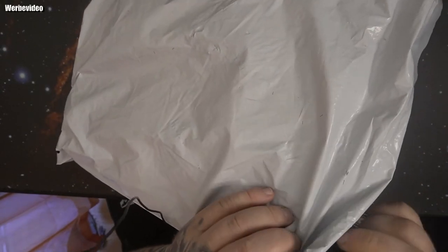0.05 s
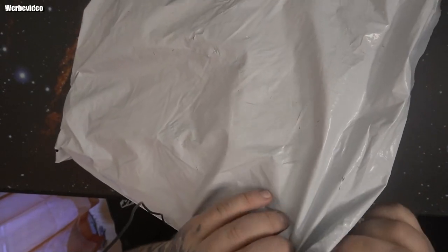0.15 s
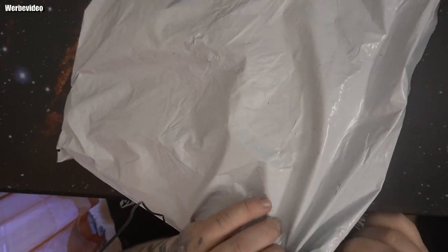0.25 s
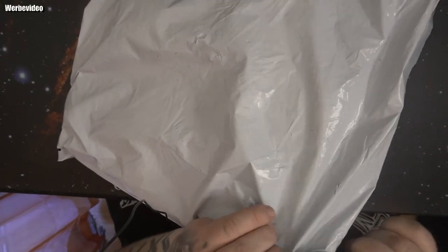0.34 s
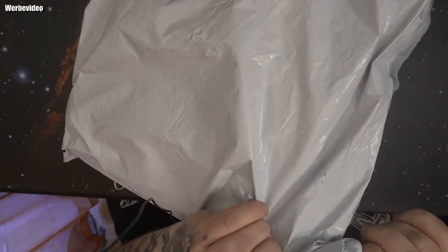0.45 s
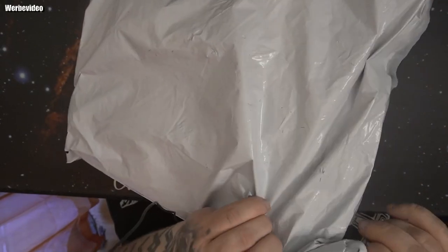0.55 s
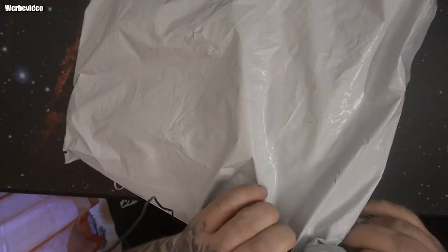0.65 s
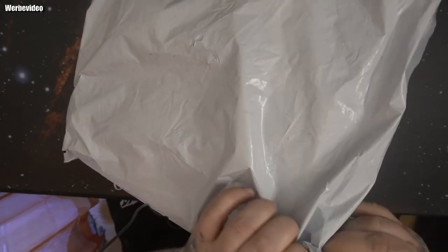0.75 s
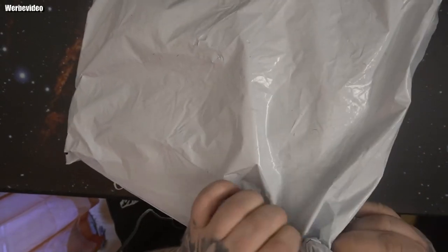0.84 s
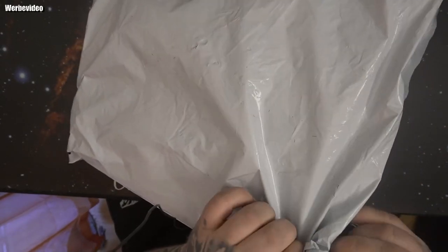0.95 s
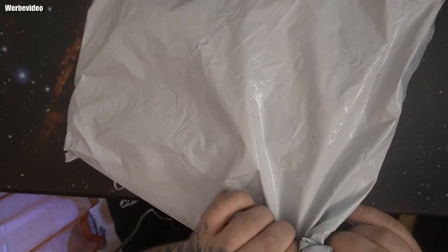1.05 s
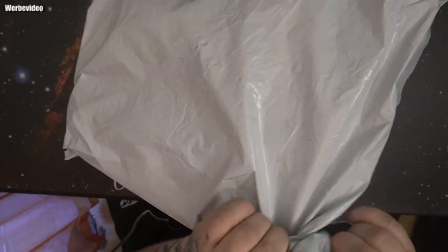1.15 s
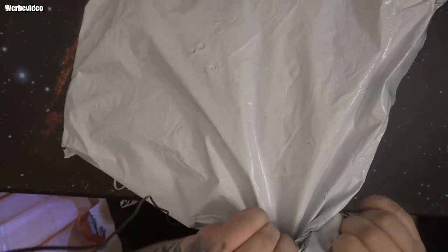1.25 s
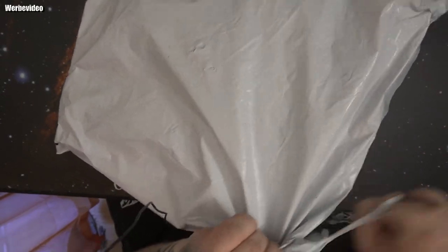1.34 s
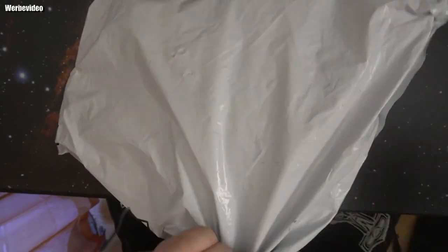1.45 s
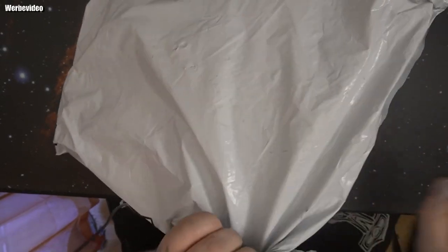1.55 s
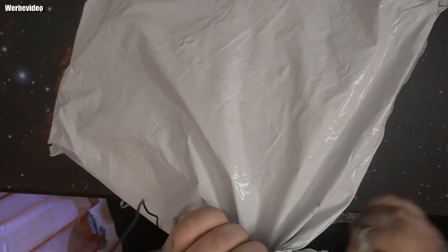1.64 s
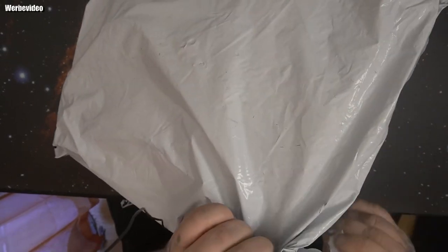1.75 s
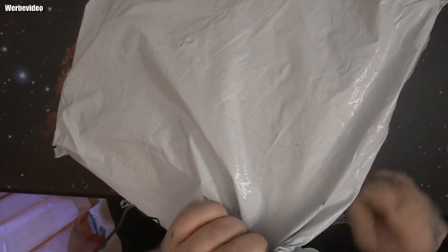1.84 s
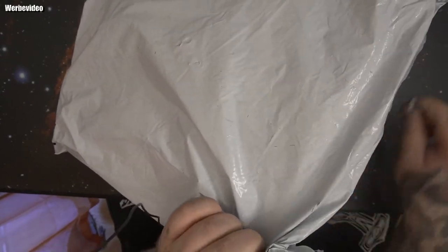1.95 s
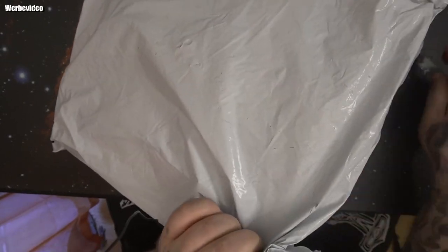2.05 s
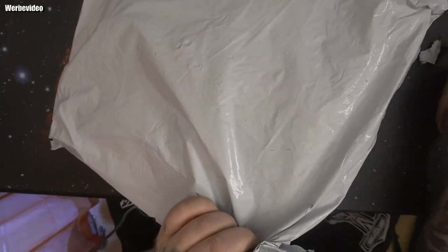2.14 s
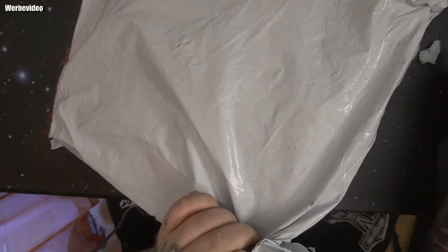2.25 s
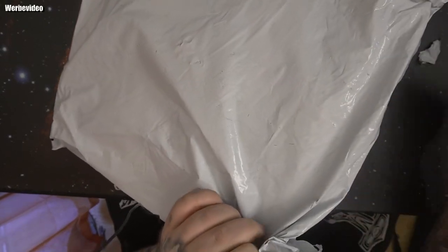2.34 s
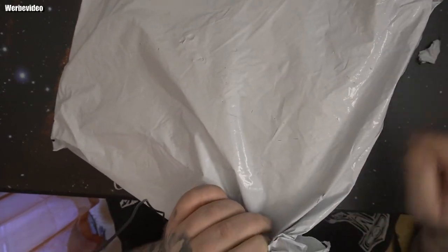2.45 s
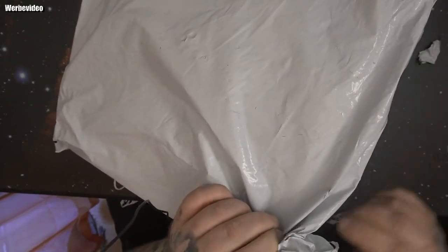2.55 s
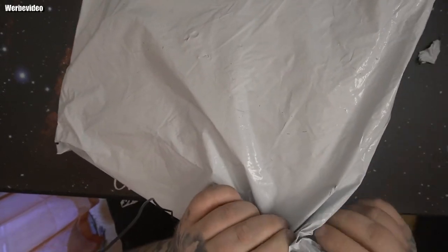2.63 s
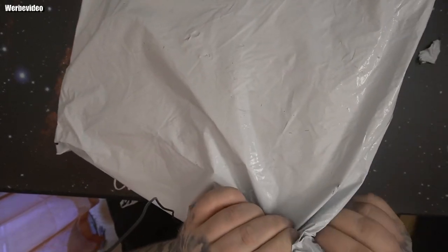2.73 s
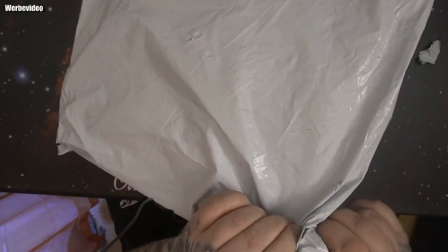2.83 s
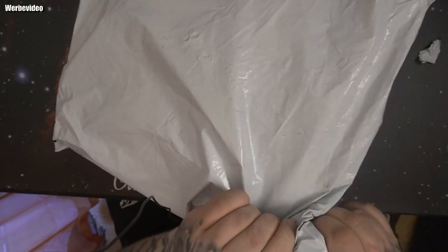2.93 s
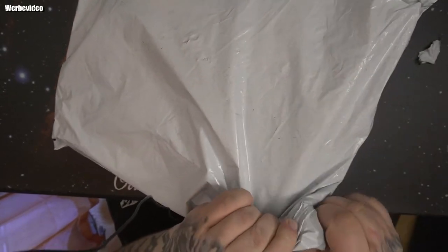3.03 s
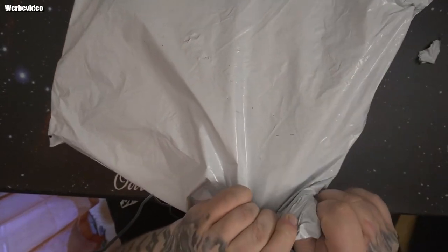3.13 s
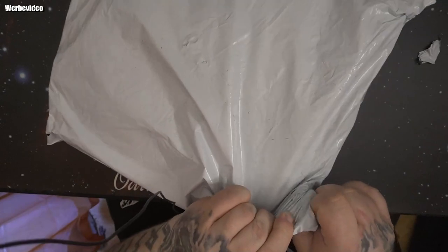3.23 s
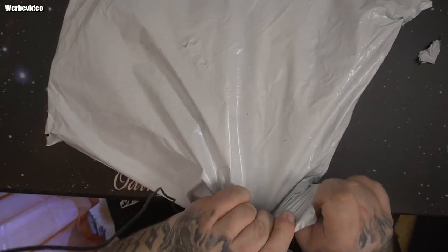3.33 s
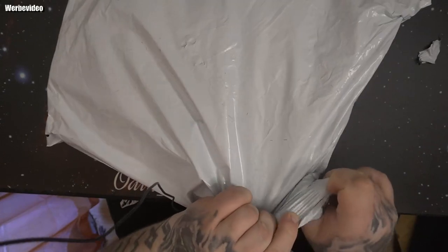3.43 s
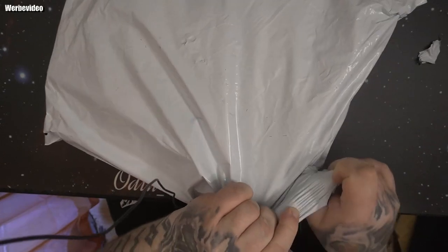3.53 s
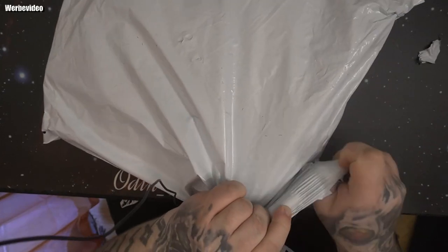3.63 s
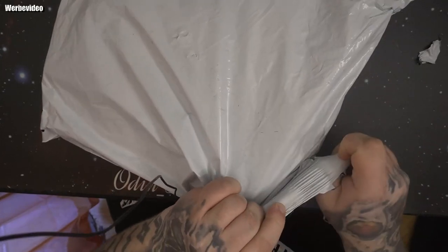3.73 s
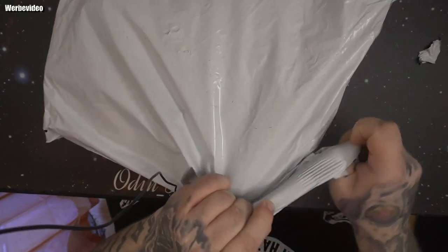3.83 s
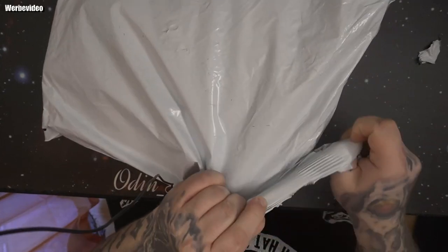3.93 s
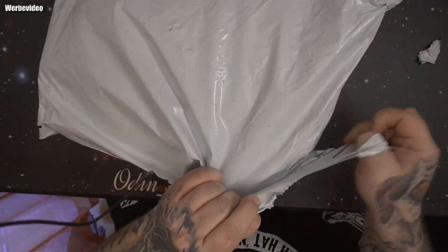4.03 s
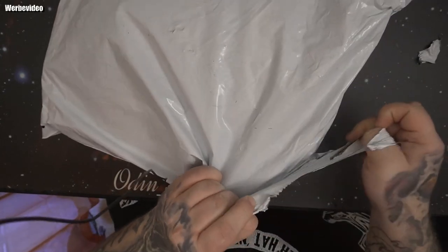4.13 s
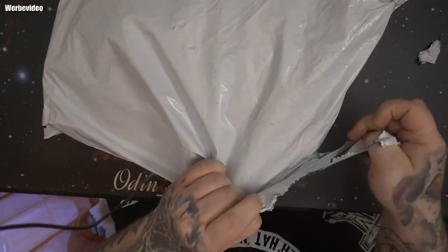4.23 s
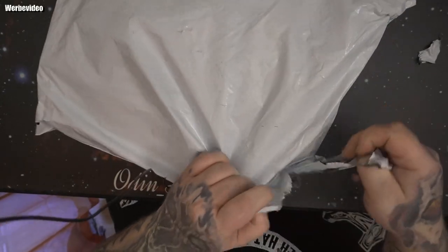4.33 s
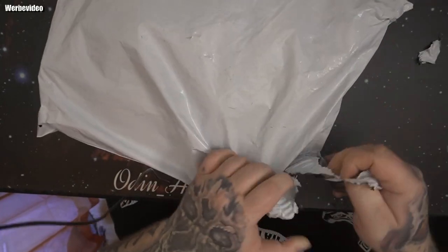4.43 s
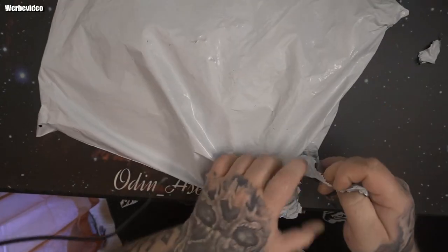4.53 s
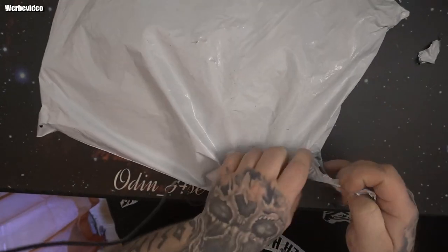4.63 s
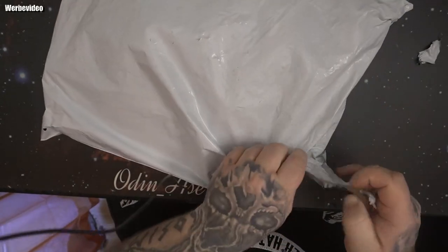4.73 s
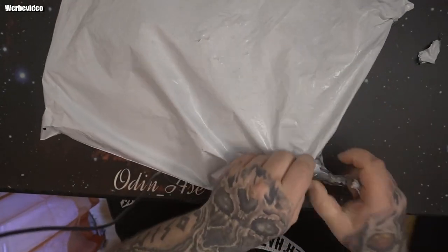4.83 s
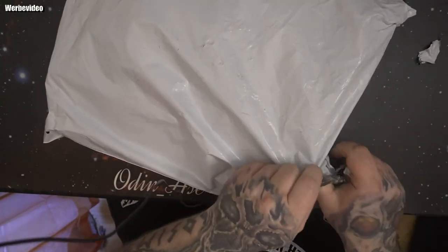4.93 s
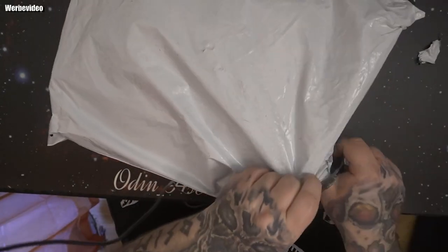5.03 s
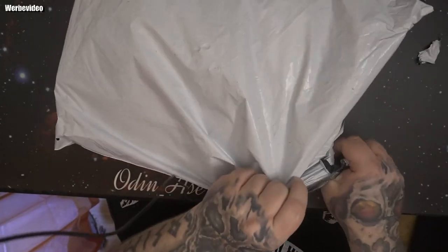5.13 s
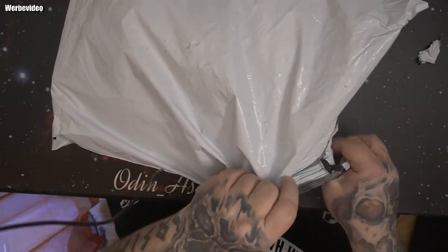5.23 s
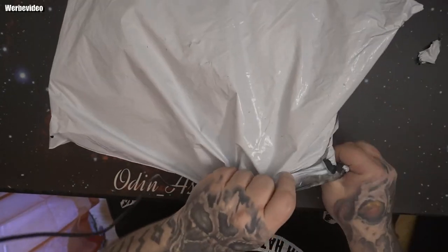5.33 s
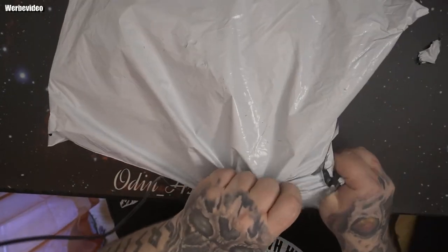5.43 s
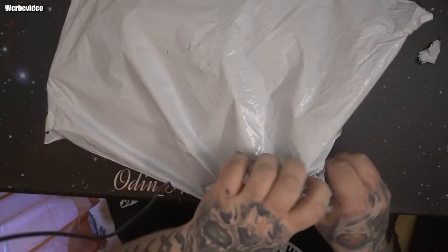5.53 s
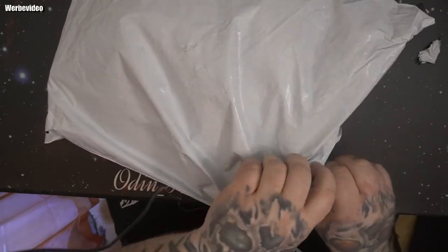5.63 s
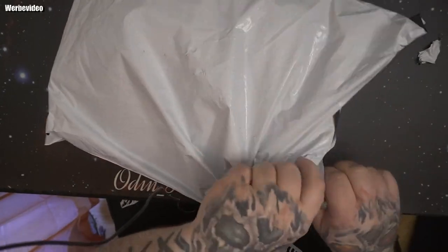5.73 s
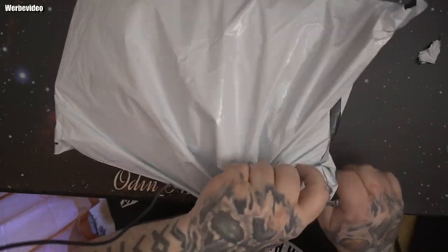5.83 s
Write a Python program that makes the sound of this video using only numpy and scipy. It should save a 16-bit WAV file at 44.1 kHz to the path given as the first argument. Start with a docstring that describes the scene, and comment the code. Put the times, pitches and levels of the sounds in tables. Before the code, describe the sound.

Close, crisp plastic crinkling with a loud early crunch, a faint rustling lull, then vigorous crackling and ripping with soft desk knocks.

```python
"""A thin plastic mailer bag is gripped, stretched and torn by two hands on a desk, close below a microphone.
Creases snap over one by one, each a tick and a noise puff ringing resonances; swarms of tiny creases
are random ticks and puffs in bands, and sliding fingers are bright noise. The microphone's desk arm sways
as noise around ten cycles a second, and is jolted, with a knock of the desk, when a hand lands.
Short feedback delays make the room around the bag; steady coloured noise is the quiet room tone."""
import sys
import numpy as np
from scipy import signal
from scipy.fft import rfft, irfft
from scipy.io import wavfile

SR = 44100
rng = np.random.default_rng(int(sys.argv[2]) if len(sys.argv) > 2 else 0)


def materialize(psi):
    """Save the field psi as 16-bit PCM at rate SR to the path in sys.argv[1].

    A 1-D psi becomes a single channel; in a 2-D psi each row is a channel.
    """
    bounded = np.clip(np.atleast_2d(psi).T, -1, 1)
    quanta = np.round(bounded * 32767).astype(np.int16)
    wavfile.write(sys.argv[1], SR, quanta)


def voltage_ratio(level):
    """Linear amplitude factor for a level in decibels (scalar or array-like)."""
    return 10 ** (np.asarray(level, float) / 20)


N = 258867

# Bag levels below are those ahead of the room.
# Loudest single creases: start_s, crisp_peak_db, crisp_pitch_hz, dull_peak_db, dull_pitch_hz
SINGLE_CREASES = [(0.0143, -33.5, 4100, -50, 1040), (0.0717, -31, 4800, -35, 980),
                  (0.111, -20.5, 6350, -41, 830), (0.1357, -13.5, 4260, -18, 1500),
                  (0.148, -20, 4140, -21, 585), (0.193, -21, 5370, -53, 440), (0.255, -30, 5000, -22, 870),
                  (0.3076, -11, 5200, -40, 1020), (0.34, -13, 3800, -32, 1380),
                  (0.351, -17, 6870, -45, 580), (0.371, -21.5, 4060, -49.5, 680),
                  (0.4168, -15, 5340, -20, 940), (0.4375, -14, 3670, -27, 900),
                  (0.454, -23, 5180, -25.5, 500), (0.4607, -18, 4130, -27, 960),
                  (0.5497, -23, 4460, -32, 607), (0.5834, -19, 5840, -47, 520),
                  (0.595, -26.5, 4730, -27, 507), (0.613, -17, 4100, -27, 705),
                  (0.629, -12.5, 5300, -24, 640), (0.6694, -19, 4310, -43.5, 940),
                  (0.6798, -14.5, 5100, -18.5, 1280), (0.7035, -10, 4000, -20, 855),
                  (0.738, -24, 5770, -38.5, 360), (0.7758, -12, 5400, -29, 1160),
                  (0.8512, -13.5, 5230, -21, 520), (0.865, -20, 6580, -29, 1070),
                  (0.8747, -19, 4240, -34, 1030), (0.9158, -16, 6030, -21.5, 1300),
                  (0.997, -16.5, 6220, -29, 1310), (1.0218, -26, 4800, -36, 620),
                  (1.0361, -16, 6250, -31, 1180), (1.0797, -17.5, 4600, -34.5, 875),
                  (1.0991, -14.5, 8560, -30.5, 550), (1.151, -24, 5250, -31.5, 1290),
                  (1.1727, -13.5, 4600, -28, 1160), (1.178, -12.5, 5070, -24, 1390),
                  (1.1922, -15, 6010, -14, 507), (1.2135, -12, 5560, -43, 910),
                  (1.33, -0.5, 3920, -6, 1500), (1.3513, 0, 4640, -21, 600), (1.3536, -9, 6060, -31.5, 900),
                  (1.368, -10.5, 5200, -32, 700), (1.3748, -7, 4700, -27, 640),
                  (1.3807, -13, 4200, -33.5, 900), (1.4011, -9.5, 7600, -16, 895),
                  (1.424, -18, 6900, -46, 820), (1.5332, -27.5, 4610, -59, 960),
                  (1.554, -35, 6120, -36, 780), (1.599, -32, 5620, -37, 610),
                  (1.608, -25, 4660, -36.5, 750), (1.6815, -32.5, 6470, -64.5, 660),
                  (1.718, -32, 4660, -38, 800), (1.735, -35, 4330, -32.5, 676),
                  (1.794, -27.5, 3610, -29.5, 1630), (1.8018, -22.5, 7100, -50, 1180),
                  (1.816, -39, 3220, -36, 750), (1.861, -28.5, 4350, -33.5, 487),
                  (1.9293, -23, 6640, -51, 590), (1.9385, -41, 6330, -40, 673),
                  (2.063, -40, 4500, -59, 420), (2.1157, -37, 4700, -53, 980), (2.15, -34, 7560, -72, 800),
                  (2.158, -31, 5530, -39, 1560), (2.1688, -30, 4280, -33.5, 1330),
                  (2.2078, -17, 8150, -49, 670), (2.257, -35, 5390, -36, 1170),
                  (2.2687, -34, 6100, -49, 1290), (2.287, -31, 7140, -46, 830),
                  (2.2927, -25, 6050, -37.5, 604), (2.3406, -32, 5940, -39, 1480),
                  (2.3967, -41, 8500, -44, 1450), (2.4077, -37, 4600, -62, 724),
                  (2.472, -39, 3370, -37, 1300), (2.4961, -32.5, 2550, -29, 845),
                  (2.511, -44.5, 11000, -60, 900), (2.5788, -45, 3910, -44, 760),
                  (2.5888, -36, 4000, -39, 1010), (2.593, -34.5, 3550, -36.5, 590),
                  (2.664, -30, 7000, -43.5, 540), (2.6898, -24, 4910, -35, 495),
                  (2.7003, -24, 5030, -38, 810), (2.705, -19.5, 4960, -40, 650),
                  (2.747, -14.5, 5150, -45, 1150), (2.7574, -26, 4500, -36, 1120),
                  (2.7966, -28, 5330, -50, 1170), (2.8196, -18, 4170, -30, 1570),
                  (2.8263, -24.5, 4570, -33.5, 840), (2.8322, -19, 4140, -26, 1370),
                  (2.846, -9.5, 4000, -27, 1370), (2.8586, -14, 5530, -30, 686),
                  (2.87, -28, 5110, -35, 860), (2.8991, -17, 5000, -36, 930), (2.9028, -17, 4900, -37, 920),
                  (2.9356, -20.5, 3400, -22.5, 1780), (2.9451, -28, 6860, -36, 760),
                  (3.023, -26, 4460, -25, 1610), (3.051, -13, 5960, -52, 1040),
                  (3.1017, -21, 5410, -50, 480), (3.161, -22, 4570, -21.5, 1270),
                  (3.1929, -9, 4840, -34.5, 840), (3.1978, -23, 6980, -50.5, 1090),
                  (3.2027, -9.5, 6740, -25, 1130), (3.2069, -13, 6500, -30.5, 1170),
                  (3.235, -19, 7200, -29, 540), (3.2573, -13, 6050, -23, 1240),
                  (3.267, -11.5, 6700, -26, 635), (3.2763, -20, 7000, -21, 910),
                  (3.298, -26, 6700, -18, 1380), (3.316, -22, 6500, -20, 1490),
                  (3.305, -31, 4510, -23, 1480), (3.342, -12.5, 4600, -24, 1790),
                  (3.3516, -14, 6640, -17, 1380), (3.4096, -10.5, 7800, -28, 1560),
                  (3.4285, -15, 5250, -24, 1010), (3.4335, -10, 6760, -43.5, 1210),
                  (3.438, -16.5, 4920, -28, 1640), (3.4547, -41, 2840, -14, 1160),
                  (3.4792, -16, 6130, -43, 940), (3.4882, -16, 6240, -25, 1510),
                  (3.4966, -13.5, 6310, -23, 1450), (3.511, -15, 4450, -39, 1750),
                  (3.5244, -9, 6300, -22, 1020), (3.5625, -17, 7100, -58, 1120),
                  (3.589, -6.5, 6900, -24, 895), (3.5985, -2.5, 5050, -17.5, 1370),
                  (3.6059, -12, 5170, -48.5, 1450), (3.613, -9.5, 6600, -22, 800),
                  (3.645, -10, 6960, -34, 1080), (3.6636, -21.5, 6590, -11, 644),
                  (3.6704, -9, 4740, -13, 925), (3.6763, -3, 6100, -41, 1240),
                  (3.6796, -12, 5200, -13, 730), (3.6848, -12.5, 5840, -28, 800),
                  (3.7383, -17, 5930, -45, 680), (3.7496, -17.5, 6070, -16, 1640),
                  (3.7657, -20.5, 7400, -53, 840), (3.8158, -8, 5760, -44.5, 1460),
                  (3.8364, -13, 5590, -32, 1140), (3.8573, -14.5, 6960, -40, 940),
                  (3.876, -16, 4750, -26, 1210), (3.8844, -17, 6960, -24.5, 1320),
                  (3.9222, -12, 4830, -37.5, 670), (3.9368, -11, 7160, -28, 1190),
                  (4.0007, -18.5, 4300, -26, 1320), (4.0176, -6.5, 5740, -29, 1700),
                  (4.018, -1.5, 5600, -4, 378), (4.019, -9.5, 2850, -10, 890),
                  (4.032, -19.5, 2650, -30, 1700), (4.066, -20, 5500, -23, 2300),
                  (4.077, -20, 5520, -47, 750), (4.089, -18, 7270, -34, 1050),
                  (4.1018, -21, 3200, -43.5, 1500), (4.159, -34, 2800, -45, 900),
                  (4.192, -34, 3000, -36, 1400), (4.2307, -23, 5420, -42, 870),
                  (4.236, -18.5, 5370, -32, 560), (4.29, -31.5, 6690, -27, 580),
                  (4.303, -16, 6300, -40, 840), (4.3218, -23, 3850, -60, 510),
                  (4.3722, -18, 7960, -28, 1540), (4.4071, -10, 4900, -41.5, 1390),
                  (4.4522, -9.5, 7340, -22, 900), (4.4571, -10, 6800, -16, 1530),
                  (4.509, -15, 6650, -31, 1500), (4.5285, -18, 6300, -51, 1550),
                  (4.5747, -16, 5860, -61.5, 1240), (4.6052, -25, 6600, -27.5, 1500),
                  (4.626, -26, 5700, -26.5, 1620), (4.6797, -18, 6350, -33.5, 1290),
                  (4.69, -16, 7800, -27, 1310), (4.771, -24, 5730, -25.5, 1410),
                  (4.776, -18, 5950, -25.5, 1020), (4.805, -23, 5200, -42, 1200),
                  (4.818, -20, 6000, -40, 900), (4.8322, -10.5, 7400, -21.5, 1000),
                  (4.854, -15, 5900, -24, 1350), (4.8845, -17, 4200, -27.5, 615),
                  (4.902, -13, 7010, -26, 880), (4.9485, -15, 6880, -20.5, 950),
                  (4.997, -30, 6000, -19, 970), (5.015, -8.5, 6800, -54, 1270),
                  (5.0424, -12, 5760, -38, 1230), (5.0554, -10, 7030, -28.5, 1160),
                  (5.0631, -5, 7400, -21, 1590), (5.069, -11, 6870, -23, 1540),
                  (5.086, -13, 7260, -23.5, 510), (5.113, -22, 7840, -37, 1420),
                  (5.1215, -26, 6810, -28, 1070), (5.1265, -15.5, 7470, -24, 640),
                  (5.134, -9.5, 7950, -19.5, 1560), (5.1948, -15, 5200, -21, 1400),
                  (5.2415, -14, 6200, -29, 1210), (5.2604, -31, 6840, -36, 1000),
                  (5.2665, -19, 6340, -29, 930), (5.275, -18.5, 5830, -32, 1320),
                  (5.353, -16.5, 6860, -48.5, 670), (5.3607, -13, 6640, -38, 1460),
                  (5.371, -24, 6570, -39, 850), (5.3789, -15, 6800, -25.5, 800),
                  (5.469, -13.5, 6400, -36, 1340), (5.4917, -18, 7300, -28, 980),
                  (5.4956, -14, 6600, -32, 1120), (5.5606, -8.5, 6800, -22, 1240),
                  (5.571, -13, 7050, -29, 920), (5.6148, -16, 5130, -30, 1370),
                  (5.627, -21.5, 6840, -50, 1120), (5.654, -9.5, 7500, -30, 1030),
                  (5.6647, -5, 7000, -20, 1190), (5.7, -10, 6760, -38.5, 1030),
                  (5.7305, -14, 5370, -29, 1120), (5.7434, -11, 6520, -23, 1500),
                  (5.7683, -10, 6700, -17, 1430), (5.7967, -14, 6630, -19, 1530),
                  (5.8107, -9, 6020, -30, 1300), (5.8133, -5.5, 6400, -30, 640),
                  (5.8344, 0, 6800, -22, 1520)]
# Typical edge of a crease above 10 kHz, against its crisp peak: time_s, level_db
CREASE_EDGE = [(0, -23.5), (.3, -9.5), (.8, -8.5), (1.2, -12.5), (1.4, 0.5), (1.7, -35), (2.3, -9),
               (2.6, -35), (3.2, -13), (3.45, -27), (3.65, -33), (4.0, -26), (4.5, -39), (5.1, -29),
               (5.867, -24)]
# Swarms that swell and die as a hand crumples a patch of film:
# peak_s, crisp_level_db, dull_level_db, rise_s_per_10_db, fall_s_per_10_db (slopes under 0.01 act as 0.01)
CRUMPLED_PATCHES = [(0.198, -33.5, -43, -0.04, 0), (.255, -51, -47, -0.3, 0.6),
                    (.304, -39.5, -38, 0.19, 0.1), (0.426, -28.5, -36, -0.01, 0.0349),
                    (0.466, -34, -34.5, 0.13, -0.01), (0.641, -33, -34.5, 0.07, 0.12),
                    (0.748, -31.5, -39, 0.04, 0.0648), (.928, -34, -37.5, 0.09, 0.09),
                    (1.029, -31, -39.5, -0.09, -0.0053), (1.093, -34.5, -45, -0.4, -0.12),
                    (1.201, -28, -33, 0.05, 0.0642), (1.368, -27, -29.5, 0.05, 0.0223),
                    (1.408, -24.5, -32, 0.03, 0.01), (1.512, -37.5, -41.5, 0.14, -0.0254),
                    (1.618, -45.5, -49.5, 1, 0.02), (1.8, -50, -49, 0, 0.13), (1.91, -50.5, -56, -0.1, 0.8),
                    (2.215, -47, -58, 0, 0.15), (2.5, -64, -54, -0.9, 0.1), (2.644, -44, -46.5, 0.02, 0),
                    (2.704, -37.5, -39.5, 0.0155, -0.03), (2.841, -37, -41, 0.08, 0.55),
                    (2.938, -34, -43, 0, 0), (3.049, -34, -37, 0.07, 0.07), (3.208, -39, -40.5, 0.02, 0.2),
                    (3.32, -34.5, -42.5, 0.0646, 0.1), (3.426, -31.5, -38, -0.18, 0.02),
                    (3.51, -36.5, -41.5, -0.32, 0.5), (3.646, -30.5, -31, -0.0461, 0.04),
                    (3.676, -29.5, -21.5, -0.0451, -0.0444), (3.74, -43.5, -43, 0, 0.2),
                    (3.83, -33.5, -35.5, -0.29, 0.16), (3.889, -28.5, -46, -0.4, 0),
                    (4.034, -33.5, -35.5, -0.22, 0.21), (4.384, -34.5, -38, -0.2, 0.17),
                    (4.466, -34.5, -38, -0.05, 0.06), (4.673, -31, -42, 0, 0.06),
                    (4.714, -27.5, -32, -0.0753, -0.04), (4.77, -34.5, -38.5, -0.13, 0.45),
                    (4.86, -34, -37, -0.12, 0.09), (4.921, -29, -34.5, -0.02, 0.02),
                    (5.0, -34.5, -42.5, -0.1, -0.2), (5.079, -28, -30.5, -0.0058, 0.12),
                    (5.37, -42, -44.5, -0.6, 0.2), (5.48, -38, -40, -0.4, 0.6),
                    (5.751, -33, -35, -0.14, 0.3), (5.867, -25.5, -29, -0.1353, -1)]
# Quiet creeping of the held film between crumples: time_s, crisp_level_db, dull_level_db
CREEPING_FILM = [(0, -46, -44), (.1, -65, -60), (.3, -51, -39.5), (.53, -55, -52), (.85, -43, -47.5),
                 (1.13, -45, -44), (1.5, -47.5, -45), (1.75, -51, -55), (2.1, -73, -54.5), (2.42, -71, -57),
                 (2.6, -65, -71), (2.8, -51, -44.5), (3.3, -46, -44.5), (3.79, -55, -54), (4.2, -45, -44.5),
                 (4.6, -44.5, -50), (5.0, -34, -40.5), (5.35, -42, -43.5), (5.867, -28.5, -33.5)]
# Gain on the crisp swarm's lower and upper parts: time_s, below_4800_hz_gain_db, above_8500_hz_gain_db
CRACKLE_SHEEN = [(0, 6.5, 6.5), (.4, 5, 5), (1.1, 6.5, 6.5), (1.35, 4, 6.5), (1.9, 5, 6), (2.05, 3, 7.5),
                 (2.25, 4, 7), (2.55, 10, 6.5), (2.85, 4, 2.5), (3.2, 5, 2), (3.6, 2, 3.5), (4.4, 4, 5),
                 (4.8, 4, 3.5), (5.1, -6, 6), (5.4, 0, 4), (5.87, 1.5, 4.5)]
# Relative spectrum of the small folds, before the sheen: frequency_hz, density_db_per_hz
SMALL_FOLD_SPECTRUM = [(2000, -25), (2600, -11.5), (3300, -3), (4000, -2), (5500, 0.5), (7500, 1),
                       (9500, -7), (12000, -17.5), (14000, -29), (15800, -35)]
# Relative spectrum of the large folds: frequency_hz, density_db_per_hz
LARGE_FOLD_SPECTRUM = [(60, -4.5), (110, -4), (200, -4.5), (380, -1), (650, 0), (1050, -4.5), (1550, -1),
                       (2200, -8), (3200, -8.5)]
# Fingers sliding over the film, level about which the hiss wanders: start_s, end_s, level_db
FINGER_SLIDES = [(0.038, 0.07, -49.5), (1.878, 1.915, -54), (1.983, 2.04, -52.5), (2.614, 2.674, -53.5)]
# Relative spectrum of skin on film: frequency_hz, density_db_per_hz
SLIDE_SPECTRUM = [(2500, -20), (6000, -9), (9000, -5), (12000, -6), (15800, -24)]
# Sway of the arm, level about which it wanders: time_s, level_db
ARM_SWAY = [(0.0, -45), (0.34, -31.5), (0.39, -48), (0.67, -28.5), (0.83, -45), (1.23, -28), (2.79, -41.5),
            (2.83, -42), (3.4, -34), (3.64, -40), (3.68, -26), (4.66, -43), (5.2, -38.5), (5.39, -27),
            (5.44, -43), (5.57, -38), (5.77, -52.5), (5.87, -30)]
# A hand landing on the desk: time_s, jolt_level_db, dip_width_s, knock_level_db
HAND_LANDINGS = [(0.738, -43, 0.015, -20), (1.188, -38.5, 0.0055, -29), (1.347, -18.5, 0.00064, -49),
                 (1.602, -29.5, 0.0019, -45), (1.722, -24.5, 0.003, -66.5), (2.005, -27.5, 0.005, -47),
                 (2.495, -25.5, 0.0044, -54), (3.681, -18, 0.0047, -50), (3.824, -18, 0.0016, -47),
                 (4.019, -24, 0.0041, -20), (4.107, -22, 0.0026, -22.5), (4.12, -47.5, 0.003, -23),
                 (4.387, -26.5, 0.0011, -57)]
# Relative spectrum of the quiet room: frequency_hz, density_db_per_hz
ROOM_TONE_SPECTRUM = [(30, 0), (60, 2.5), (200, -5.5), (700, -12), (1800, -22), (2500, -67), (4600, -52),
                      (9000, -61), (12000, -38), (15800, -54)]


def rms_one(x):
    """Normalise by mean power: scale to rms 1."""
    return x / np.sqrt(np.mean(x ** 2) + 1e-20)


def peak_one(x):
    """Normalise by peak amplitude: scale to peak 1."""
    return x / np.abs(x).max()


def in_time(rows):
    """Linear interpolation: each column of a time table at every sample."""
    s, *columns = np.transpose(rows)
    return [np.interp(np.arange(N) / SR, s, column) for column in columns]


def at_hz(spectrum, hz):
    """Logarithmic pitch: read a spectrum on a log-frequency axis."""
    points_hz, points_db = np.transpose(spectrum)
    return np.interp(np.log(hz), np.log(points_hz), points_db)


def drift(rate_hz):
    """Low-passed chance: two equal poles leave a slow wander of spread 1."""
    step = 40  # samples between computed points
    r = np.exp(-2 * np.pi * rate_hz * step / SR)
    slow = signal.lfilter([1], [1, -2 * r, r * r], rng.standard_normal(N // step + 2002))
    slow = rms_one(slow[2000:])  # drop the filter's start
    return np.interp(np.arange(N) / step, np.arange(len(slow)), slow)


def resonance(x, hz, width_hz):
    """Damped resonator: a pole pair with a gain near 1 at its peak."""
    r = np.exp(-np.pi * width_hz / SR)
    poles = [1, -2 * r * np.cos(2 * np.pi * hz / SR), r * r]
    return signal.lfilter([(1 - r * r) / 2, 0, (r * r - 1) / 2], poles, x)


def butter(x, order, hz, kind="low"):
    """Maximally flat filtering: pass one part of the spectrum."""
    return signal.sosfilt(signal.butter(order, hz, kind, fs=SR, output="sos"), x)


def coloured_noise(spectrum):
    """Spectral shaping: weight the frequencies of white noise, then scale to rms 1."""
    hz = np.maximum(np.arange(N // 2 + 1) * SR / N, 1)
    return rms_one(irfft(rfft(rng.standard_normal(N)) * voltage_ratio(at_hz(spectrum, hz)), N))


def snaps():
    """Impulse excitation: a flipping crease rings its fold high while the panel behind answers low."""
    rows = np.array(SINGLE_CREASES)
    start_s, crisp_db, crisp_hz, _, dull_hz = rows.T
    crisp_t60_s, edge_t60_s, dull_t60_s = 0.0036, 0.00069, 0.016  # the first two vary by crease, as does dull
    t = np.arange(3072) / SR
    out = np.zeros(N + len(t))

    noise = rng.standard_normal((len(rows), 3, len(t)))
    noise[:, :, 0] += 2.65 * np.sign(noise[:, :, 0])  # the tick
    noise[:, 2, 0] += 11 * np.sqrt(2000 / dull_hz)  # one firm push on the panel
    luck = rng.standard_normal((len(rows), 2))
    lengths = voltage_ratio(0.4 * luck[:, 0])
    edges_db = crisp_db + np.interp(start_s, *np.transpose(CREASE_EDGE)) + 1.5 * luck[:, 1]
    edges_db = edges_db + 7 * np.log2(crisp_hz / 5740)  # finer creases have more edge: 7 dB an octave
    settling = voltage_ratio(-16 - 60 * t / 0.05)  # the film shivers on after the flip

    for row, (fine, finest, coarse), length, edge_db in zip(rows, noise, lengths, edges_db):
        s, db, hz, low_db, low_hz = row
        puff = fine * (voltage_ratio(-60 * t / (crisp_t60_s * length)) + settling)
        ring = resonance(resonance(puff, hz, 0.37 * hz), hz, 0.5 * hz)
        crisp = rms_one(ring) + voltage_ratio(-6) * rms_one(butter(puff, 3, [2900, 9500], "band"))

        sharp_puff = finest * (voltage_ratio(-60 * t / (edge_t60_s * length)) + settling)
        edge = butter(sharp_puff, 3, [9800, 15000], "band")

        thump = coarse * voltage_ratio(-60 * t / (dull_t60_s * length))
        panel = resonance(resonance(thump, low_hz, 0.7 * low_hz), low_hz, 0.83 * low_hz)
        dull = rms_one(panel) + voltage_ratio(-9) * rms_one(butter(thump, 2, [220, 2200], "band"))

        i = round(s * SR)
        snap = voltage_ratio(db) * peak_one(crisp) + voltage_ratio(edge_db) * peak_one(edge) + voltage_ratio(low_db) * peak_one(dull)
        out[i:i + len(t)] += snap
    return out[:N]


def effort():
    """Addition of powers: creeping film and all crumples give the crisp and dull levels in dB."""
    t, power = np.arange(0, N + 32, 32) / SR, 0
    for s, crisp_db, dull_db, rise, fall in CRUMPLED_PATCHES:
        loss_db = 10 * np.where(t < s, (s - t) / max(rise, .01), (t - s) / max(fall, .01))
        power = power + voltage_ratio(np.array([[crisp_db], [dull_db]]) - loss_db) ** 2
    crumples = [np.interp(np.arange(N) / SR, t, p) for p in power]
    return 10 * np.log10(voltage_ratio(np.array(in_time(CREEPING_FILM))) ** 2 + crumples)


def swarm(spectrum, per_s, spread_db, clump_db, burst_s, tail_s, octaves, hiss_db, tick):
    """Random pulse train: tiny creases are ticks and dying noise puffs, strongest around their own pitch."""
    # per_s is the birth rate before the clumping; burst_s and tail_s are times of a 60 dB decay
    born = np.flatnonzero(rng.random(N) < per_s * voltage_ratio(clump_db * drift(25)) / SR)
    luck = rng.random((N, 3))[born]
    sign = np.zeros(N)
    sign[born] = np.where(luck[:, 2] < .5, -1, 1)
    size = voltage_ratio(spread_db * np.minimum(-np.log(1 - luck[:, 0]), 3.0))
    edges = np.geomspace(spectrum[0][0], min(spectrum[-1][0], .45 * SR), num=14)
    pitch = edges[0] * (edges[-1] / edges[0]) ** luck[:, 1]
    hiss = voltage_ratio(hiss_db) * np.sqrt(per_s / np.mean(per_s))  # a floor between the creases
    white, out = rng.standard_normal((2, N)), np.zeros(N)
    for k, (low, high) in enumerate(zip(edges, edges[1:])):
        hz = np.sqrt(low * high)
        clicks = np.full(N, 1e-18)
        clicks[born] = size * np.exp(-.5 * (np.log2(hz / pitch) / octaves) ** 2)
        # low pitches ring on for longer
        fade = voltage_ratio(-60 / ((burst_s + 5.0 / hz) * SR))
        burst = signal.lfilter([1], [1, -fade], clicks)
        settling = 0.13 * signal.lfilter([1], [1, -voltage_ratio(-60 / (tail_s * SR))], clicks)
        puffs = rms_one(burst + settling) + hiss
        band = butter(puffs * (white[k % 2] + tick * sign), 2, [low, high], "band")
        out += rms_one(band) * voltage_ratio(at_hz(spectrum, hz)) * np.sqrt(high - low)
    return rms_one(out)


def crackle():
    """Size and pitch: the grip drives a crisp swarm of small folds and a duller rustle of large ones."""
    crisp_db, dull_db = effort()
    # a harder grip folds more creases a second: 0.15 dB of rate per dB of level
    busy = voltage_ratio(0.15 * (crisp_db - crisp_db.mean()))
    crisp = swarm(SMALL_FOLD_SPECTRUM, per_s=900 * busy, spread_db=4.0, clump_db=2.14,
                  burst_s=0.0018, tail_s=0.033, octaves=0.54, hiss_db=-8, tick=0.95)
    dull = swarm(LARGE_FOLD_SPECTRUM, per_s=400 * busy, spread_db=4.0, clump_db=3.5,
                 burst_s=0.0013, tail_s=0.062, octaves=1.13, hiss_db=-1, tick=2.3)
    lower_db, upper_db = in_time(CRACKLE_SHEEN)
    lower = butter(crisp, 2, 4800)
    upper = butter(crisp, 2, 8500, "high")
    crisp = crisp + (voltage_ratio(lower_db) - 1) * lower + (voltage_ratio(upper_db) - 1) * upper
    return voltage_ratio(crisp_db) * crisp + voltage_ratio(dull_db) * dull


def slides():
    """Friction noise: skin on smooth film gives a soft bright hiss of wandering level."""
    t, touch = np.arange(N) / SR, 0
    edge_s = 0.0065  # linear fade at both ends
    for start, end, db in FINGER_SLIDES:
        touch = touch + voltage_ratio(db) * np.clip(np.minimum(t - start, end - t) / edge_s, 0, 1)
    return touch * voltage_ratio(2.0 * drift(40)) * coloured_noise(SLIDE_SPECTRUM)


def room(x):
    """Interference and reverberation: a desk-echo dip, then eight feedback delays, duller on every round."""
    t60_s, wall_cut_hz = 0.16, 4200  # the decay time holds for the lowest pitches
    out, dull = np.zeros(N), np.exp(-2 * np.pi * wall_cut_hz / SR)
    lags = (rng.uniform(.008, .03, size=8) * SR).astype(int)
    for k, lag in enumerate(lags):
        loop, gain, state = x.copy(), voltage_ratio(-60 * lag / SR / t60_s), [0.]
        for i in range(lag, N, lag):
            back, state = signal.lfilter([gain * (1 - dull)], [1, -dull], loop[i - lag:i], zi=state)
            loop[i:i + lag] += back[:N - i]
        out += (loop - x) * (-1) ** k
    # a dip where the echo off the desk top cancels the direct sound
    dip = 0.37 * resonance(x, 3300, 630)
    return x - dip + voltage_ratio(-18) * out


def microphone_arm():
    """Driven and struck resonators: the arm sways; a jolt is a sharp dip, a swing back and a desk knock."""
    t = np.arange(N) / SR
    arm_hz, arm_width_hz, desk_hz = 9.7, 7.6, 276
    sway = resonance(rng.standard_normal(N), arm_hz, arm_width_hz)
    sway = rms_one(butter(sway, 2, 22))
    out = voltage_ratio(in_time(ARM_SWAY)[0] + 2.5 * drift(8.9)) * sway
    rumble = rms_one(resonance(rng.standard_normal(N), desk_hz, 220))  # the desk top's many low modes
    for s, db, width, knock_db in HAND_LANDINGS:
        after = np.maximum(t - s, 0)
        dip = -np.exp(-np.abs(t - s) / width)
        swing = 0.84 * np.sin(2 * np.pi * 22 * after) * np.exp(-after / 0.014)
        knock = np.sin(2 * np.pi * desk_hz * after) * np.exp(-after / 0.0045)
        knock = knock + 0.079 * rumble * (t > s) * np.exp(-after / 0.04)
        out += voltage_ratio(db) * (dip + swing) + voltage_ratio(knock_db) * knock
    return out


def room_tone():
    """Stationary noise: a quiet room as steady coloured noise at -54 dB rms."""
    return voltage_ratio(-54) * coloured_noise(ROOM_TONE_SPECTRUM)


def scene():
    """Superposition: the bag in its room, the microphone arm and the room tone add up."""
    bag = snaps() + crackle() + slides()
    return (room(bag) + microphone_arm() + room_tone())[None]


def band_limit(x):
    """A steep low-pass at the top of the band."""
    return signal.sosfilt(signal.butter(12, 16980, fs=SR, output="sos"), x)


def record(dry):
    """Band limiting and overload: the top is cut by 50 dB from 16 kHz up, and the loudest peaks are clipped."""
    cut = signal.sosfilt(signal.cheby2(12, 50, 16000, fs=SR, output="sos"), dry)
    clipped = np.clip(cut, -0.88, 0.88)
    return band_limit(clipped)


dry = scene()
out = record(dry)
materialize(out)
```